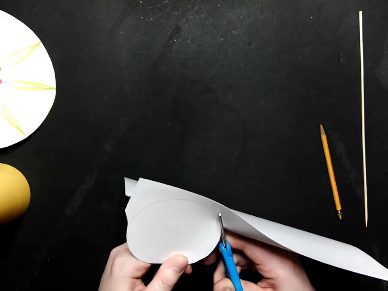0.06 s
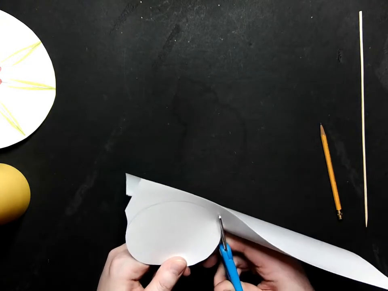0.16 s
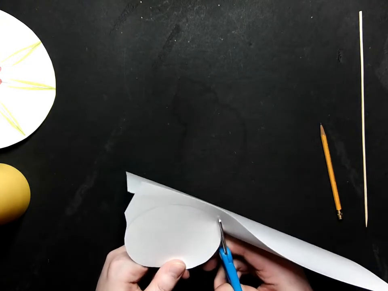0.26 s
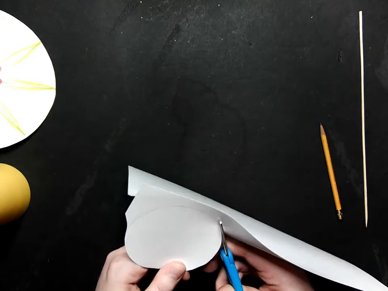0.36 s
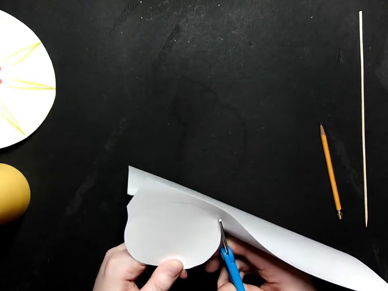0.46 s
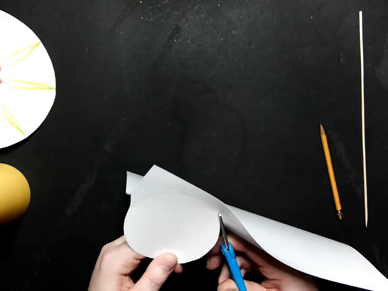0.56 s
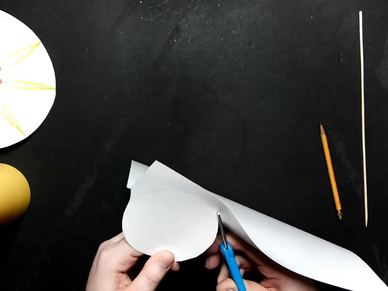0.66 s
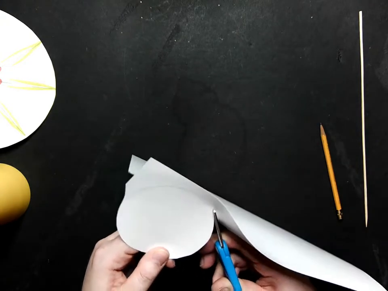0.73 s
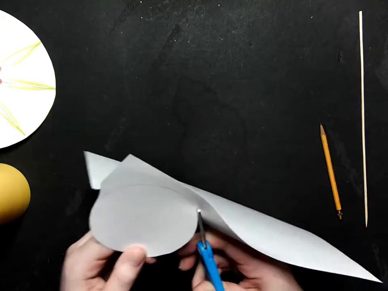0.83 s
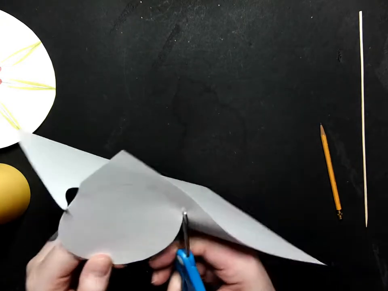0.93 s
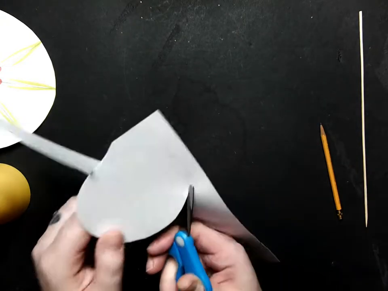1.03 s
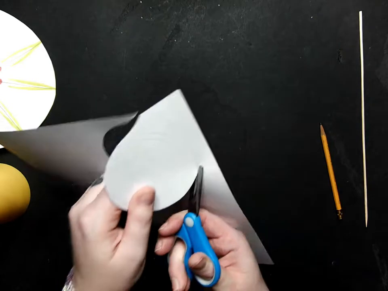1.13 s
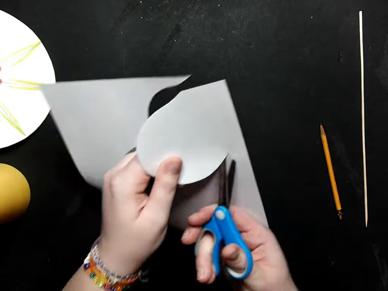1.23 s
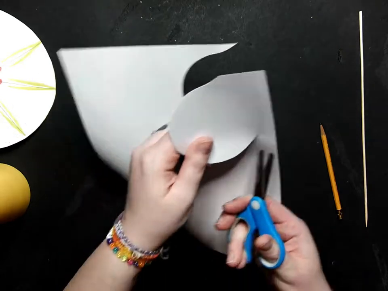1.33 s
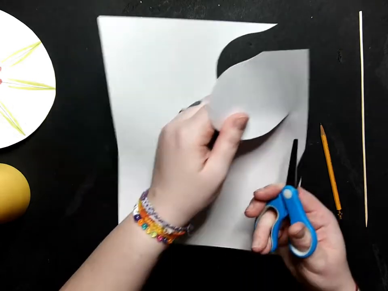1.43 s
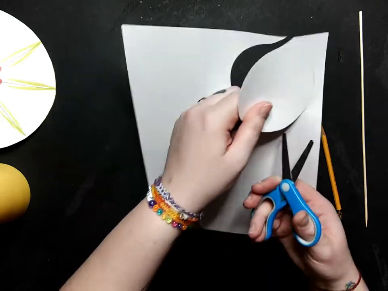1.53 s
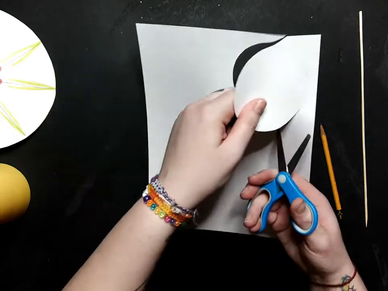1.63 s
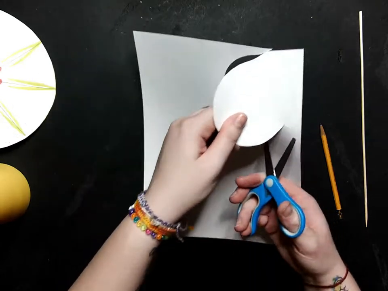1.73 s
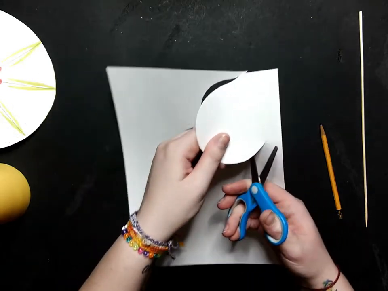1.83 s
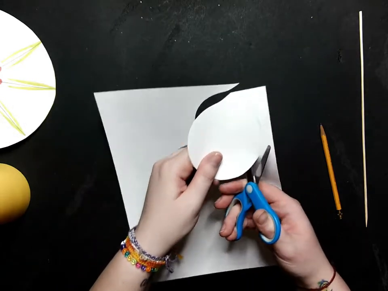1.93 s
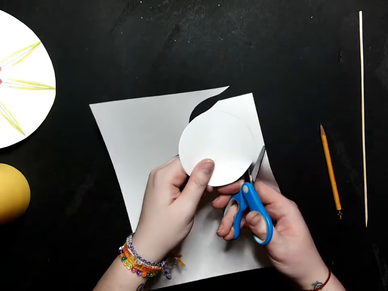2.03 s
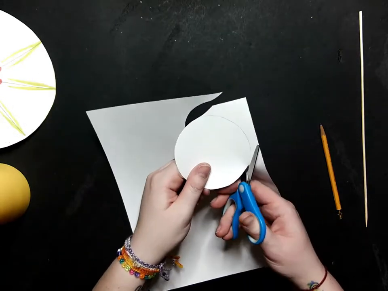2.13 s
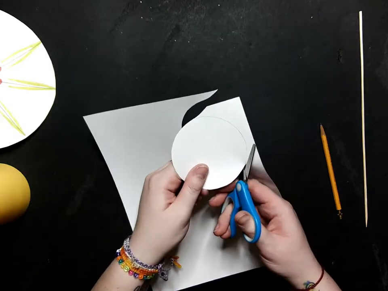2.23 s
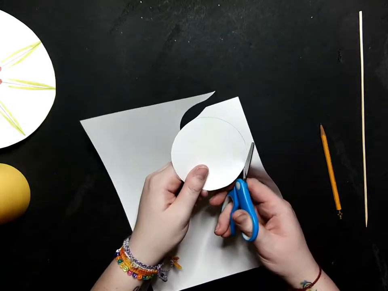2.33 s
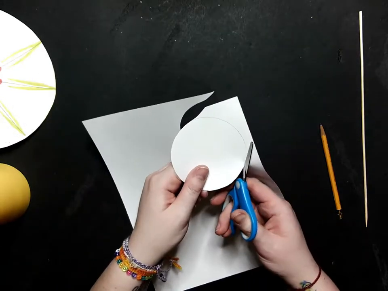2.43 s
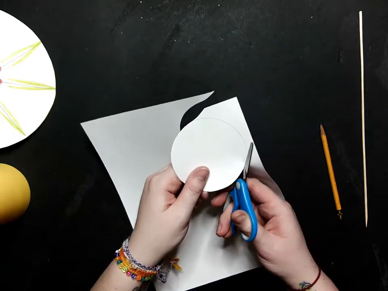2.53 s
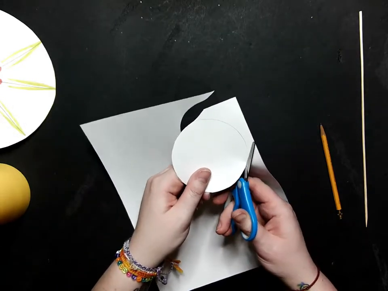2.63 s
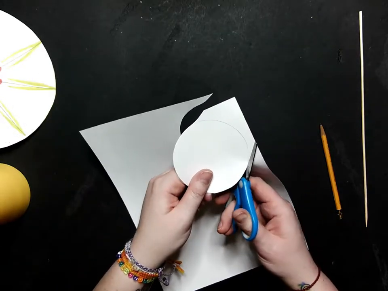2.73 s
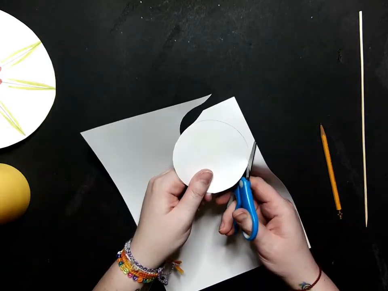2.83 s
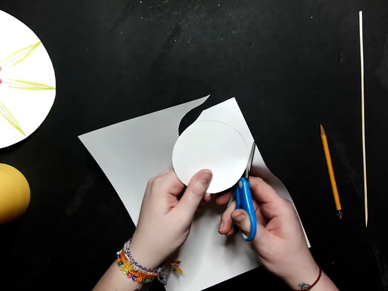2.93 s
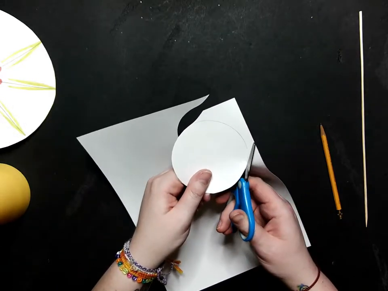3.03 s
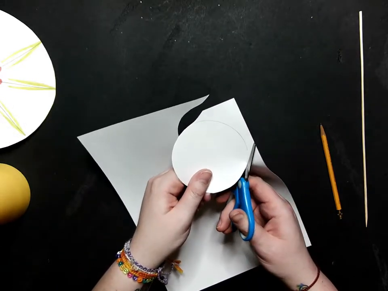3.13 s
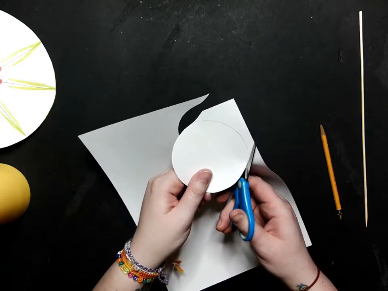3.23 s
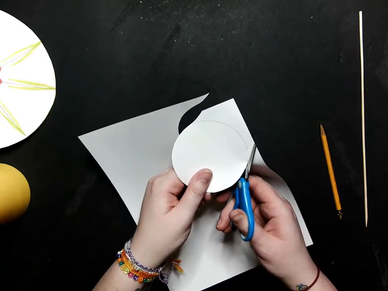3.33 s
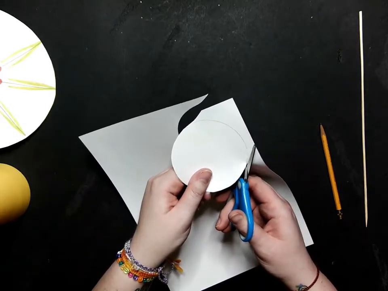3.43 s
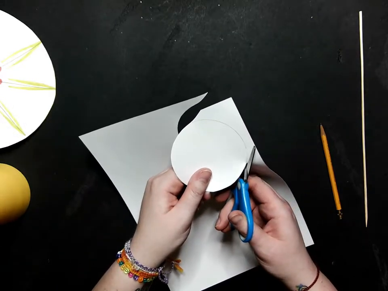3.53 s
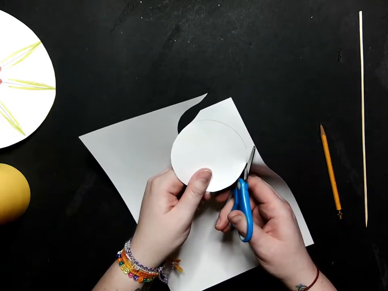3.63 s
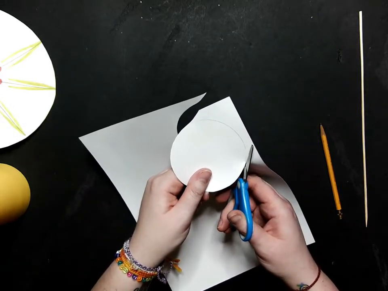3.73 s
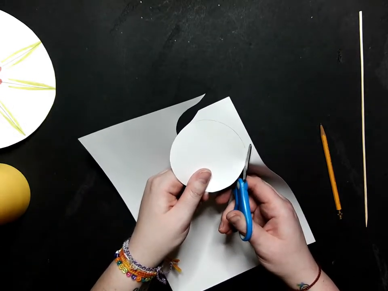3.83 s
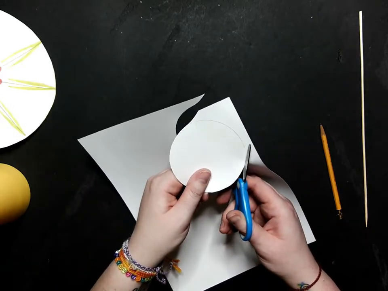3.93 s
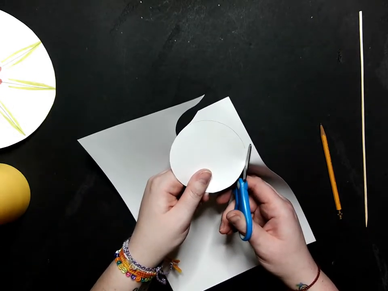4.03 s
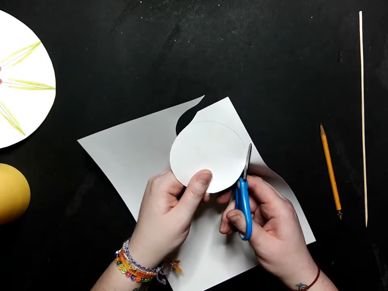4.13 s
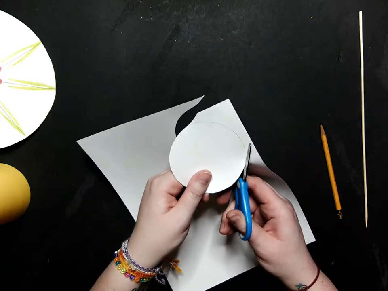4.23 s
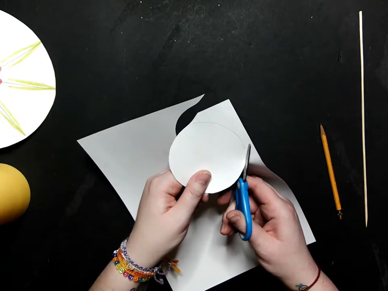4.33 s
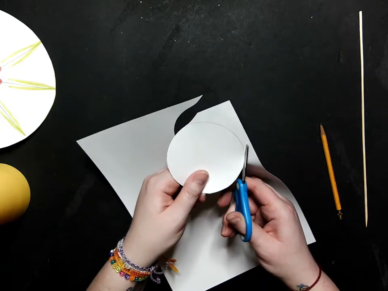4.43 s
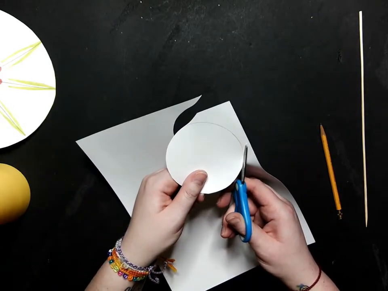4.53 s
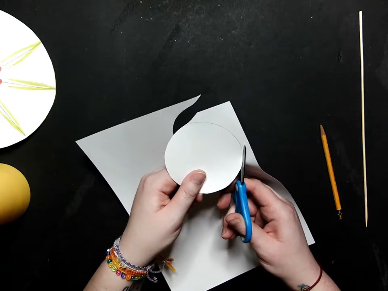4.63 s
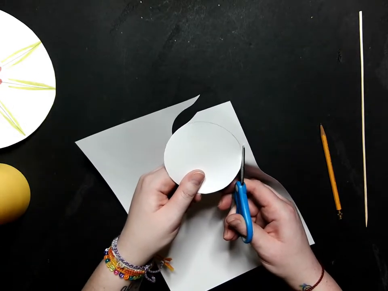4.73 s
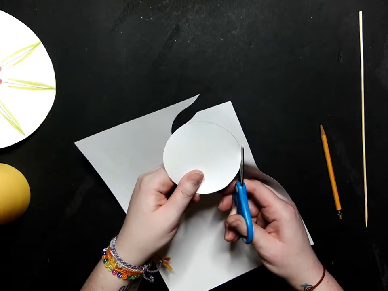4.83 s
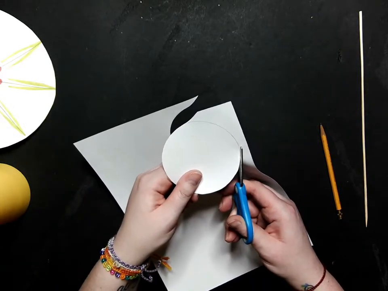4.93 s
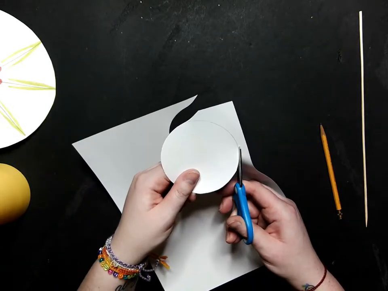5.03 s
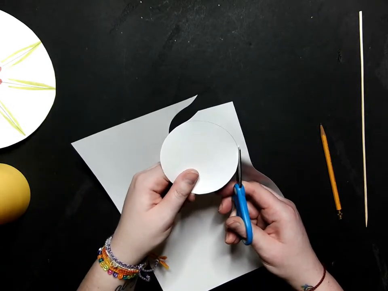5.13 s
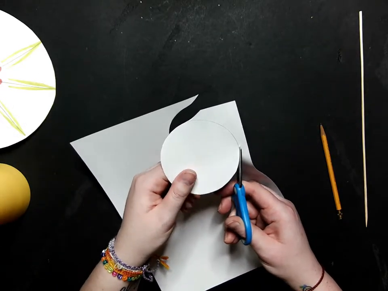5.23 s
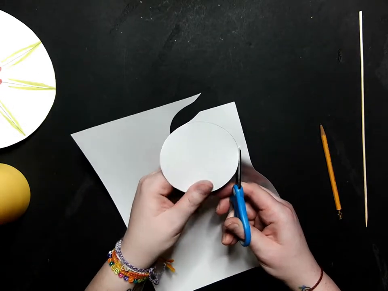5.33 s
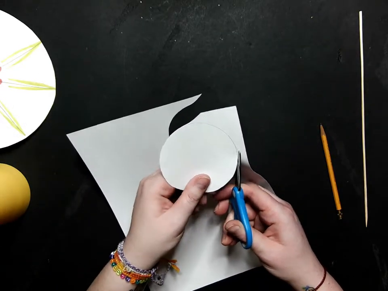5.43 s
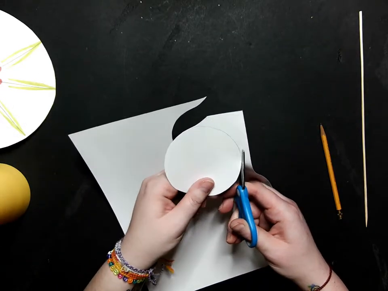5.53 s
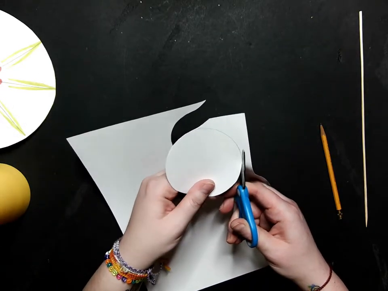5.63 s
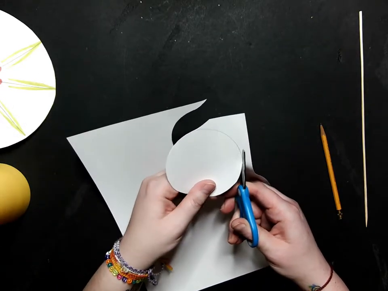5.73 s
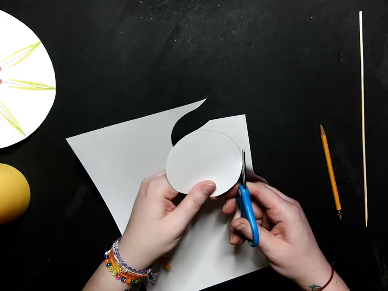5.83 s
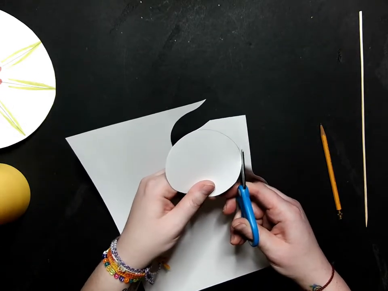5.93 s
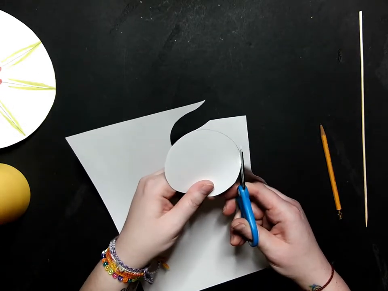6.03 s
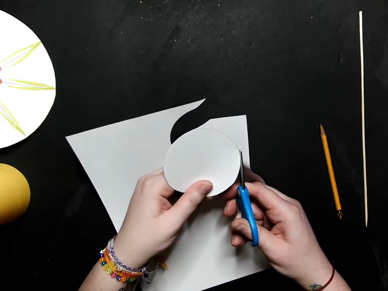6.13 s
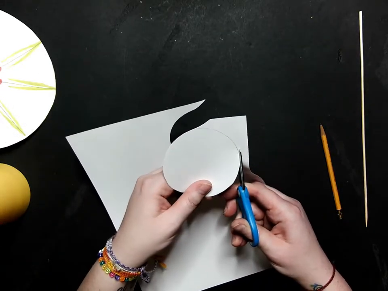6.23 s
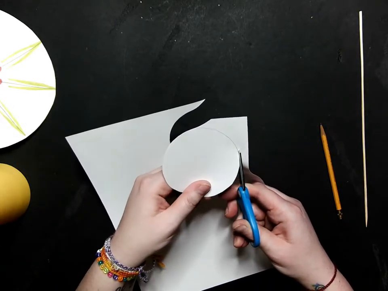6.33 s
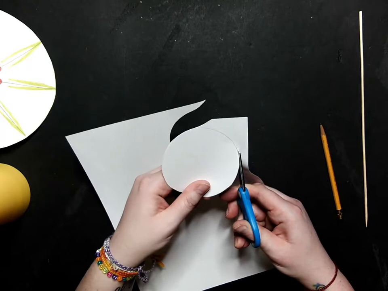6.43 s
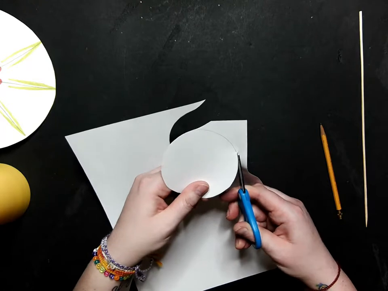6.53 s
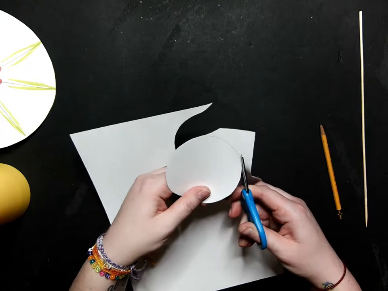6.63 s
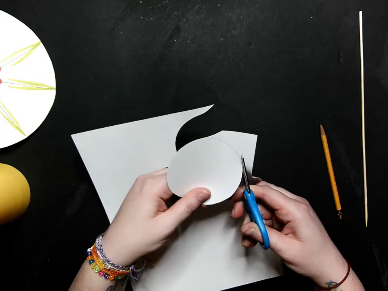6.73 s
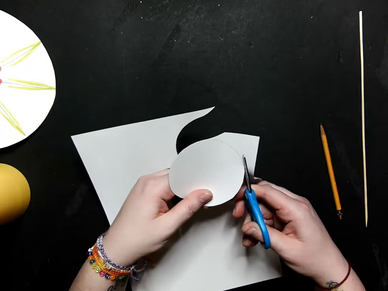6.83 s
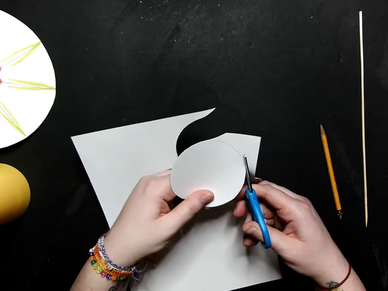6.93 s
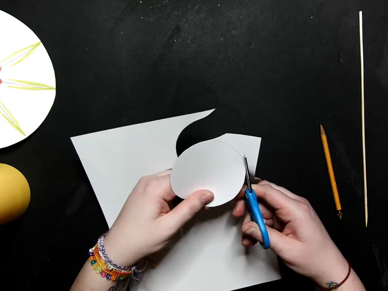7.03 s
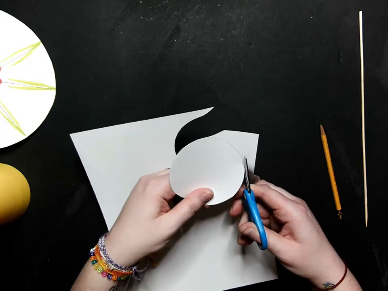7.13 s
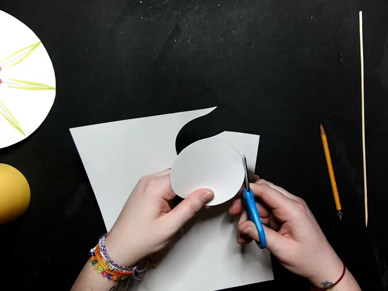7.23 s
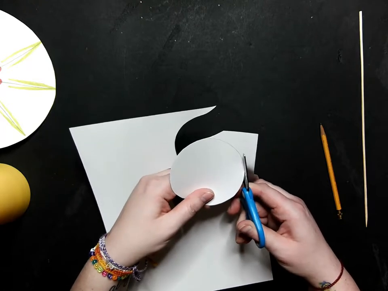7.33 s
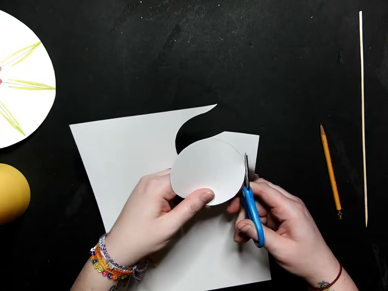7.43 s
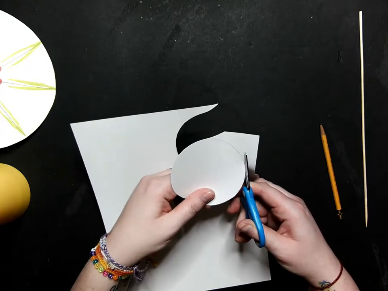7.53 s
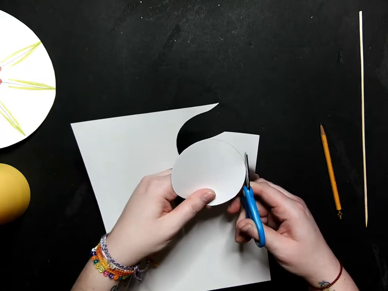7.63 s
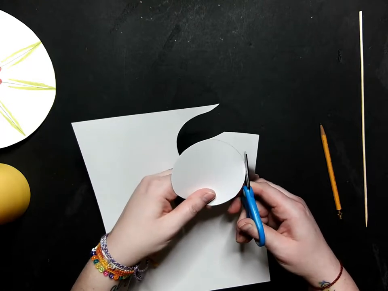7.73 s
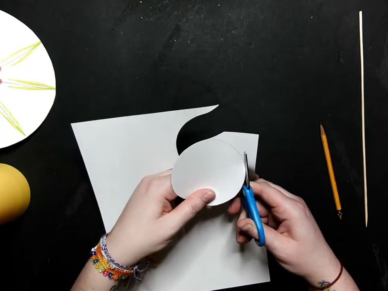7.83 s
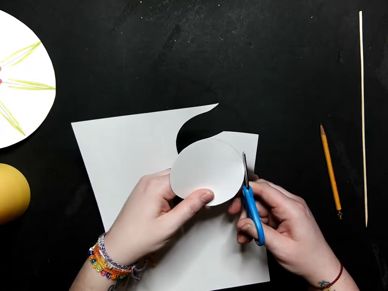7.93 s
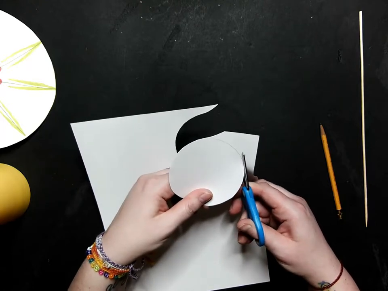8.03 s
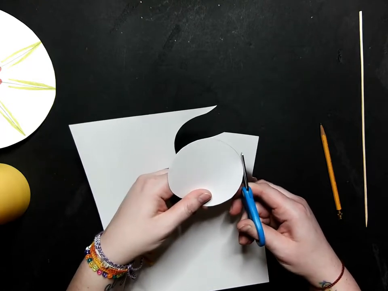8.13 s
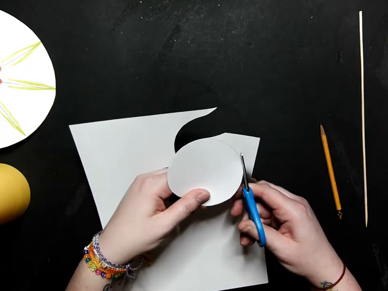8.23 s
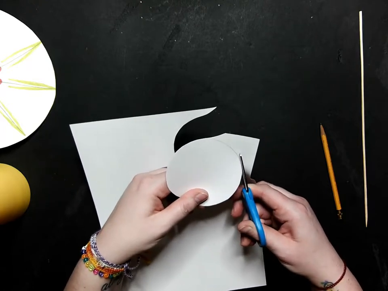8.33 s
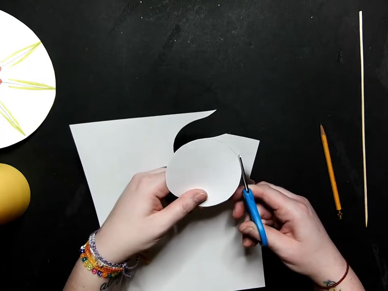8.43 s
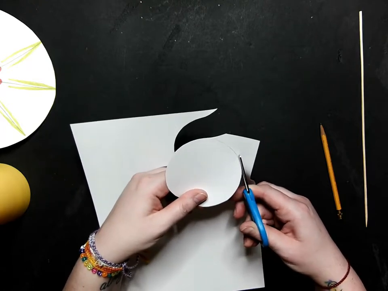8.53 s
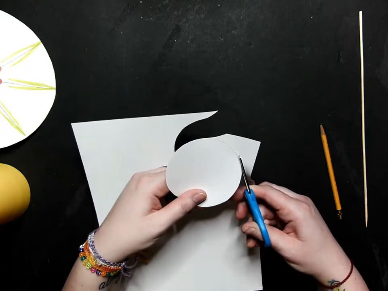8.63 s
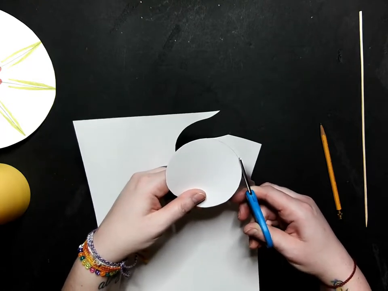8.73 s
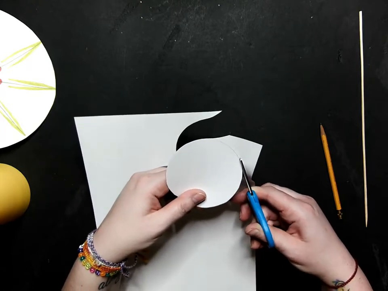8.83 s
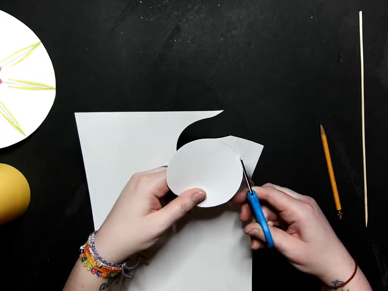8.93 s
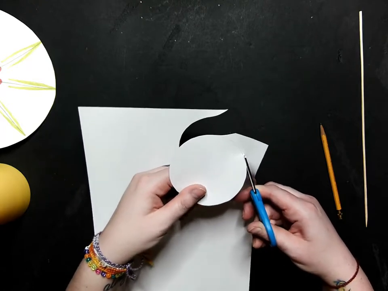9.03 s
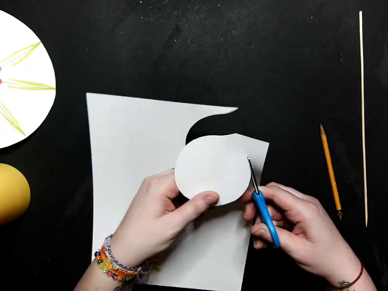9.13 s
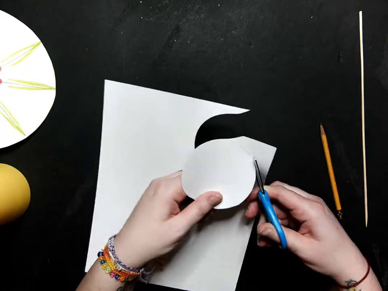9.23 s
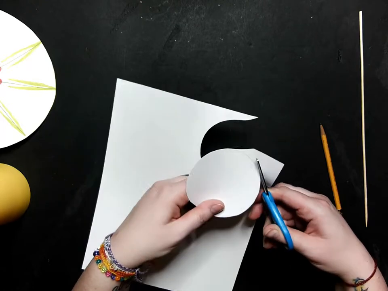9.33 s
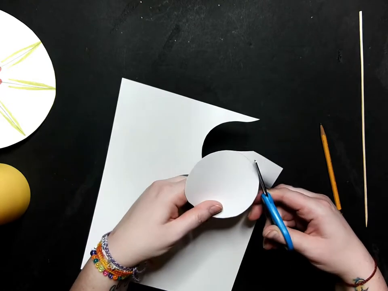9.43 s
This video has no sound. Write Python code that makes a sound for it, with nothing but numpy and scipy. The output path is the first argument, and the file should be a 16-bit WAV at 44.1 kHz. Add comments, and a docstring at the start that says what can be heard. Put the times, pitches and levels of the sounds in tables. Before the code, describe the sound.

A close, dry perspective on small scissors cutting stiff paper in a quiet indoor room. From 0 to 0.5 s a rasp and rapid, uneven crisp cracks. From 0.7 to 1.6 s the sheet is turned: airy swishes, a few cracks, and hollow, wobbling flaps, strongest near 1.25 and 1.4 s. Brief squeaky blade creaks come at 1.8-1.95 s with soft sliding, then sparse light scrapes and faint ticks from 2.3 to 3.9 s. A dense burst of crunching snips runs 4.1-5.1 s, followed by rustles to 5.6 s. Another sharp cluster falls at 5.85-6.4 s, then lighter scrapes and a swish near 7.1 s. Quiet cuts lead to firmer snips around 8.2 s, a fine metallic ticking at 8.35-8.7 s, two loud snaps at 8.8-8.9 s, and papery sliding with small snips until about 9.5 s. Faint hiss underneath.

```python
"""A rasp and a quick run of sharp cracks are heard first: small scissors cut a circle out of stiff card, close by.
Card fractures in short bursts of breaking fibres, filtered by the held sheet; the blades scrape as jerky noise
and now and then stick and slip, each slip striking a bank of damped steel modes. Between cuts the sheet is turned
and slides over hands and table as flickering noise, and it flaps as it buckles, with a hollow low wobble.
The quiet, dry room adds a short diffuse tail, over a faint hiss."""
import sys
import numpy as np
from scipy import signal
from scipy.fft import rfft, irfft, next_fast_len
from scipy.io import wavfile
from scipy.ndimage import uniform_filter1d

SR = 44100
rng = np.random.default_rng(int(sys.argv[2]) if len(sys.argv) > 2 else 0)


def transcribe(u):
    """Save the signal u as a 16-bit wav file named by the first command-line argument.

    u: samples, shape (n,) or (channels, n), limited to [-1, 1]; the rate is SR.
    q: integer samples, one column per channel.
    """
    v = np.clip(np.atleast_2d(u).T, -1, 1)
    q = np.round(v * 32767).astype(np.int16)
    wavfile.write(sys.argv[1], SR, q)


N = 417627

# Fractures of the card: start_s, length_s (held within 0.002 to 0.025), level_db, body_db
FRACTURES = [(0.033, 0.0094, -29.5, -0.5), (0.0526, 0.004, -31.5, 5.5), (0.123, 0.0084, -44, -6.5),
             (0.156, 0.0062, -27, -0.5), (0.1927, 0.0059, -27, 1), (.3087, 0.005, -36.5, 10),
             (0.3561, .005, -35, 5.5), (0.3656, 0.01, -31, 3.5), (0.396, .009, -40.5, -2),
             (0.4397, 0.0097, -29.5, 1.5), (0.4787, 0.0024, -32.5, 8), (.488, 0.0028, -35.5, 0),
             (0.504, 0.0015, -29.5, -8), (0.5192, 0.011, -41, 2.5), (0.848, 0.019, -35.5, 1),
             (.907, .018, -37, -1), (1.0363, 0.0097, -41, 7.5), (1.0515, 0.0076, -34.5, -3.5),
             (1.095, 0.011, -37.5, 0), (2.541, 0.0079, -50, -0.5), (3.7605, 0.0063, -47.5, 6),
             (3.929, .008, -65, -19), (3.963, 0.00658, -58.5, 8.5), (4.12, 0.0037, -53.5, 4.5),
             (4.1306, 0.0038, -44, 7.5), (4.158, 0.0046, -31, 3.5), (4.184, .011, -38.5, 1),
             (4.203, .011, -41, 5), (4.2742, 0.011, -34.5, 1), (4.313, .014, -50, -3),
             (4.3618, 0.007, -33, 4), (4.4, 0.0097, -42.5, -6), (4.4643, 0.0035, -34.5, 0.5),
             (4.499, 0.0062, -33.5, -2.5), (4.511, 0.0092, -42.5, 1.5), (4.5614, 0.014, -39.5, -17),
             (4.6261, 0.0068, -28, -0.5), (4.6977, 0.0025, -30.5, 0), (4.7664, 0.016, -45.5, 0),
             (4.8126, .011, -30, -0.5), (4.8926, 0.008, -33, -1.5), (4.902, 0.0031, -25.5, -2),
             (4.936, 0.015, -38.5, -3.5), (4.967, .008, -46.5, 4), (5.054, 0.0065, -44.5, -12),
             (5.0732, 0.0047, -26, -7), (5.5144, 0.021, -44, -11), (5.646, .004, -65, -1),
             (5.704, .017, -60.5, -22), (5.773, 0.0048, -53.5, -2), (5.826, 0.0098, -59, -8.5),
             (5.8493, 0.0074, -33, -0.5), (5.9112, 0.008, -34.5, -8.5), (5.9426, 0.00131, -30, 2),
             (5.951, .003, -32.5, -3), (5.9866, 0.0093, -25.5, -7), (6.006, .0064, -33, 1),
             (6.026, .0077, -35.5, 0.5), (6.225, 0.0073, -38.5, -27), (6.276, 0.0036, -30.5, 0.5),
             (6.345, 0.0043, -47.5, 3.5), (6.3575, 0.0062, -22.5, -11), (6.4075, .003, -26, -7.5),
             (6.6879, 0.01, -42, -8.5), (6.806, 0.011, -55.5, 17.5), (6.868, 0.012, -50.5, -1),
             (6.9936, 0.012, -48.5, 2.5), (7.241, 0.0125, -52, -0.5), (7.304, 0.011, -48, -17),
             (7.353, 0.0179, -41, -1), (7.595, 0.019, -65, -13), (7.813, .008, -56, -22),
             (7.831, .006, -54, -19), (7.8512, 0.008, -44.5, -2), (7.8929, 0.00616, -42, -1),
             (8.041, 0.0058, -40, -2), (8.078, 0.0052, -45.5, -10.5), (8.1012, 0.0044, -42, -10.5),
             (8.166, .0083, -31, 1), (8.2005, 0.0059, -23, -5), (8.227, .009, -34, -2),
             (8.817, 0.0098, -21.5, -1.5), (8.8767, 0.0047, -20, -8.5), (9.1133, 0.01, -33, 8),
             (9.3007, 0.0054, -44, -5), (9.322, 0.0087, -44, -13)]
# Single slips of blade on blade: start_s, level_db, body_db, air_db
SINGLE_SLIPS = [(2.7031, -69, -13, 14), (2.7477, -51, 12, 4), (3.1622, -69, 7, 5),
                (3.3962, -64.5, -18, 8.5), (3.839, -74.5, 2, 10.5), (3.8709, -85, 3, 6),
                (7.7325, -79, 0, -9), (8.4086, -54.5, -30, -7), (8.4904, -52, -20, -13),
                (8.6022, -55, 9.5, 0), (8.7437, -51.5, 21, 2)]
# Blades dragging along the card: start_s, length_s (at least 0.01), first_level_db, body_db, swell_db (start to end)
STROKES = [(0, 0.018, -34, 16, -22.5), (0.098, .15, -49.5, 6, -12), (0.309, 0.023, -39.5, -11, -16),
           (.362, .175, -57.5, 7, 5), (2.279, 0.014, -48.5, -10, 2), (2.31, .047, -43.5, 0, -3.5),
           (2.46, 0.023, -47, 1, -1), (2.557, 0.084, -41.5, 3.5, 0), (2.705, 0.16, -45, -1.5, -11),
           (2.899, 0.015, -41, -6.5, -8.5), (2.976, 0.047, -42.5, -3.5, -11.5),
           (3.094, 0.014, -55.5, -11, -10), (3.199, 0.022, -47, -2.5, -2.5), (3.275, 0.036, -43.5, -3, -13),
           (3.419, 0.028, -59, -1, -9), (3.598, .069, -55.5, -8, -5.5), (3.764, 0.042, -61, -13, -6.5),
           (4.162, .17, -57, 2, -1.5), (4.348, 0.11, -48, -5, -16), (4.455, 0.079, -55, -4.5, -1),
           (4.564, 0.0267, -53, -1, 3), (4.635, 0.16, -50.5, 0, -8), (4.831, 0.19, -48.5, 0, -1.5),
           (5.073, 0.059, -42, 3.5, -18), (5.78, 0.066, -69, -1, -3), (5.854, 0.041, -48, 1.5, -14),
           (5.913, 0.091, -54.5, 7.5, -11), (5.992, 0.0728, -36.5, 1.5, -17.5),
           (6.228, 0.089, -42.5, -2.5, -22.5), (6.344, 0.14, -49.5, 2, -12.5), (6.69, 0.052, -49, 5, -4.5),
           (6.799, 0.072, -52, 2, -3.5), (7.284, 0.11, -55, -3, 8.5), (7.83, .12, -64, -12, 0),
           (7.994, .14, -71, -12, 12.5), (8.177, 0.085, -57, 1.5, 5.5), (8.539, 0.071, -44, -9, -13),
           (8.619, .12, -48, -3, -5), (8.744, 0.15, -49.5, 3.5, 3), (9.284, 0.085, -59, 8.5, -10)]
# Buckling of the sheet: peak_s, rise_s, t60_s, level_db, thump_db
BUCKLINGS = [(.92, 0.026, 0.18, -43.5, 17), (1.068, 0.019, 0.081, -42.5, 19),
             (1.258, 0.0056, 0.145, -26.5, 1.5), (1.402, 0.013, 0.11, -18, -4.5),
             (1.47, 0.018, 0.28, -32, 4.5)]
# Modes of the blades: frequency_hz, relative_level_db, free_t60_s
BLADE_MODES = [(2017.8, -19, .016), (2730, -6.5, 0.06), (2360, 14.5, 0.048), (3430, 14, 0.042),
               (3870, -19, 0.0093), (4770, 15.5, 0.041), (5560, 12, 0.021), (6130, 21.5, 0.01),
               (7970, -16, .011), (8570, -26, .014), (9900, -24, .012), (11200, -2, .01),
               (13000, -11, 0.0052), (14700, -15, 0.0064)]
# Spectral envelopes, relative within each: frequency_hz, density_db
SNAP_COLOUR = [(40, -27), (100, -27.5), (200, -14), (380, 0), (600, -1), (1400, -0.5), (1700, -3.5),
               (2400, 1.5), (4300, 1), (6200, -2.5), (9000, -7), (12000, -7.5), (16000, -19.5)]
STROKE_COLOUR = [(70, -39.5), (200, -25.5), (500, -1), (750, -0.5), (1700, -1.5), (2400, 2), (3000, -1.5),
                 (4600, 4), (5400, -4.5), (7000, 1.5), (9000, -4.5), (12000, -2.5), (16000, -15)]
SLIDE_COLOUR = [(70, -39), (140, -18), (280, -4), (480, 8), (1300, 2.5), (1650, -4), (2300, -3),
                (3000, -4.5), (4400, -2.5), (5400, -7), (7000, -6), (10000, -11.5), (16000, -21)]
FLAP_COLOUR = [(70, -42.5), (140, -14.5), (300, -4), (580, 3), (1250, 1), (1600, -6.5), (2500, -10.5),
               (3600, -33.5), (8000, -45.5), (16000, -62)]
CONTACT_COLOUR = [(100, -61), (450, -14.5), (1000, -27), (1700, -3), (2400, 5), (6000, 2.5), (11000, 4.5),
                  (16000, -5.5)]
HISS_COLOUR = [(30, -25), (80, -15), (130, -2), (500, -6), (900, -6), (1800, -6.5), (2400, -5),
               (3500, -10.5), (4500, -9.5), (8000, -14), (16000, -19)]
# Ring of the sheet and the room: centre_hz, t60_s, level_db
ROOM_BANDS = [(199.07, 0.23, -8), (497, 0.13, -7), (1410, 0.058, -10.5), (3700, 0.089, -16.5),
              (9990, 0.051, -14)]
# How the sheet is held until the hand shifts again: start_s, ring_hz, note_hz, air_db
GRIPS = [(0, 4300, 1190, -1), (.045, 3370, 1180, 1.5), (.175, 4250, 670, -1), (.33, 4160, 354, 0.5),
         (.42, 3390, 345, -1), (.46, 3380, 1200, -0.5), (.7, 4070, 575, -1.5), (2.24, 4630, 600, 4),
         (2.51, 2650, 700, 3), (3.72, 5920, 600, -1), (4.34, 5750, 1380, -1.5), (4.79, 3760, 330, 0),
         (4.897, 6060, 560, -2.5), (5.65, 5270, 448.8, -0.5), (5.97, 2240, 459, -1.5),
         (6.0, 5200, 450, 1.5), (6.25, 3840, 984, 1.5), (6.6, 2027, 520, -0.5), (7.21, 4830, 523, 0.5),
         (7.33, 2250, 520, -1.5), (7.6, 3480, 903.2, 0.5), (8.185, 2350, 864, -1), (8.45, 4100, 1044, 3),
         (8.85, 2270, 1003, 0)]
# Even runs of stick-slip: start_s, length_s, gap_s, first_level_db, body_db, air_db
SLIP_RUNS = [(2.808, .06, 0.017, -65.5, 1, 15), (3.606, .09, 0.02674, -60.5, 5, 1),
             (8.3482, .04, 0.015, -53.5, -26, -2.5), (8.427, .01, 0.0076, -61, -11.5, -9.5),
             (8.502, .068, .0079, -46.5, 8, -3.5), (8.536, .02, .0088, -53.5, 20, -1),
             (8.623, .085, 0.01, -51, 13, 0.5)]
# Creaks on one note, as of closing blades: start_s, length_s, first_level_db, note_hz
CREAKS = [(1.817, 0.068, -32, 2200), (1.905, 0.047, -34.5, 2290), (6.804, 0.04, -46.5, 1481)]
# Swishes of the turning sheet: peak_s, rise_s, fall_s, level_db, body_db, air_db
SWISHES = [(.75, 0.078, 0.13, -42.5, -9, 0), (.91, 0.0709, 0.036, -35.5, -8.5, -6.5),
           (1.02, 0.089, 0.1282, -47, -5.5, -8.5), (1.171, 0.026, 0.0243, -50, -5.5, -6.5),
           (1.262, 0.04, 0.041, -42, -1, -6), (1.36, 0.034, 0.033, -38, -8.5, -1),
           (1.48, 0.038, .12, -46.5, 11, -8), (1.649, 0.035, 0.058, -42.5, -5, -11),
           (1.76, .1, 0.0857, -37, -16.5, -3.5), (1.93, 0.087, .2, -42.5, -9, -3.5),
           (2.19, 0.14, 0.039, -46, -10, -3), (5.169, 0.018, 0.0257, -45, -33, -4.5),
           (5.281, .085, 0.086, -38.5, -3.5, -3.5), (5.42, 0.065, .055, -41.5, -11, -8.5),
           (5.55, .05, 0.048, -49, -17, -4.5), (6.52, 0.032, 0.0875, -39.5, -17, -8),
           (7.018, .08, 0.058, -59, -1.5, -12), (7.13, 0.068, 0.058, -42, -9, -6),
           (8.9, 0.033, .1, -48, -10.5, -4), (9.08, 0.084, .06, -37.5, -8.5, -4),
           (9.199, 0.074, 0.067, -41, -12.5, -4), (9.46, 0.0642, 0.053, -42.5, -13, -4)]

BODY_HZ, MID_HZ = (150, 1500), (1500, 7000)  # bands in which levels are set
TOP_HZ = 15900
HIT_SIZE = 4096  # samples; a struck sound lasts half of this
HISS_DB = -79  # before the suppressor
# small random cracks: densest rate in strokes, length, level over the scrape and its scatter
CRACKLE_PER_S, CRACKLE_S, CRACKLE_DB, CRACKLE_SPREAD_DB = 18, .004, 3, 2
CRINKLE_PER_S, CRINKLE_DB = 16, -4  # the same in the bending sheet; level over the swish
# a run weakens as the pressure eases; contact crack against ring
SLIP_FADE_DB_PER_S, SLIP_JITTER_S, CONTACT_DB = 81, .0003, -2.5
STROKE_AIR_DB, STROKE_RING_DB = -2.5, 4  # against the air of the grip; height of its ring
CREAK_RING_DB, CREAK_SWELL_DB, CREAK_BODY_DB, CREAK_AIR_DB = 15, -6.5, 3.5, -7.5
SWISH_EDGE_DB, SWISH_SHAPE = -10.5, 2.33  # level one rise before or one fall after the peak; flatness of top
BREAK_LOOSE_S = .014  # the sheet lets go this quickly at the start of a swish


def undb(db):
    """Logarithmic level: decibels become an amplitude gain."""
    return 10 ** (np.asarray(db) / 20)


def unit(x):
    """Normalisation: scale to rms 1."""
    return x / np.sqrt(np.mean(x ** 2) + 1e-20)


def add(out, s, x):
    """Superposition: mix x into out from time s on."""
    i = int(min(s * SR, N - 1))
    x, i = x[max(-i, 0):], max(i, 0)
    out[i:i + len(x)] += x[:N - i]


def slope(points, hz):
    """Spectral envelope: join (Hz, dB) points on a log-frequency axis."""
    f, db = np.transpose(points)
    return np.interp(np.log(hz + 1), np.log(f), db)


def paint(x, colour, band=MID_HZ, body_db=0, air_db=0,
          ring_hz=3000, ring_db=0, ring_octaves=.2, ripple_db=0):
    """Minimum-phase filtering: envelope, two shelves and a resonance; white input keeps its rms in the band."""
    n = 2 * next_fast_len(len(x) // 2 + HIT_SIZE // 2)
    hz = np.arange(n // 2 + 1) * SR / n
    shelves = slope([(1200, body_db), (2000, 0.0045), (5500, 0.0024), (9000, air_db)], hz)
    ring = ring_db / (1 + (np.log2((hz + 1) / ring_hz) / ring_octaves) ** 2)
    # waves bouncing between the sheet's edges ripple the spectrum, drawn anew for each sound
    knots = np.linspace(0, np.sqrt(SR / 2), 80)
    ripple = ripple_db * np.interp(np.sqrt(hz), knots, rng.standard_normal(80))
    db = slope(colour, hz) + shelves + ring + ripple
    in_band = (hz > band[0]) * (hz < band[1])
    db = db - 10 * np.log10(np.mean(undb(db) ** 2 * in_band))
    # folding the cepstrum onto positive time makes the filter causal
    cepstrum = irfft(np.log(undb(db)))
    cepstrum[1:n // 2] *= 2
    cepstrum[n // 2 + 1:] = 0
    return irfft(rfft(x, n) * np.exp(rfft(cepstrum)), n)


def split(x, edges_hz):
    """Complementary filtering: cut a sound into neighbouring bands that sum to it again."""
    lows = [signal.sosfiltfilt(signal.butter(4, hz, fs=SR, output="sos"), x) for hz in edges_hz]
    return np.diff([0 * x, *lows, x], axis=0)


def walk(n, rate):
    """Slow random modulation: chance values joined by lines, with a spread near 1."""
    at = np.arange(n) * rate / SR
    count = int(at[-1]) + 2
    return 1.1 * np.interp(at, np.arange(count), rng.standard_normal(count))


def fibres(n, rate, spread_db, rub):
    """Impulsive fracture noise: fibres break at random, a few of them big, over smooth rubbing."""
    hit = rng.random(n) < rate / SR
    size = undb(spread_db * np.minimum(rng.exponential(size=n), 4))
    breaks = unit(hit * size * rng.choice([-1, 1], n))
    return unit(breaks + rub * rng.standard_normal(n))


def judder(n, rate, depth_db):
    """Stick-slip friction: uneven jerks, each sinking by depth_db before the next."""
    phase = np.cumsum(rate * np.exp(0.71 * walk(n, rate)) / SR) + rng.random()
    return unit(undb(-depth_db * (phase % 1)))


def resonate(x, hz, width_hz):
    """Resonance: one damped mode, gain 1 at its centre."""
    return signal.lfilter(*signal.iirpeak(hz, hz / width_hz, fs=SR), x)


def flex(x, depth_db, size=5):
    """Shifting resonances of a bending sheet: neighbouring frequencies swell and sink together."""
    _, _, frames = signal.stft(x, nperseg=512)
    field = rng.standard_normal(frames.shape)
    field = uniform_filter1d(field, size, axis=0)
    field = uniform_filter1d(field, 2 * size, axis=1)
    return signal.istft(frames * undb(depth_db * unit(field)))[1][:len(x)]


def grip(s):
    """Boundary conditions: ring_hz, note_hz and air_db of the sheet as it is held at time s."""
    return [GRIPS[0], *(row for row in GRIPS if row[0] <= s)][-1][1:]


def scatter(length, rate):
    """Stratified chance: one moment in each equal share of the length, as (after_s, luck_db)."""
    count = int(length * rate)
    return [((k + rng.random()) / count * length, CRACKLE_SPREAD_DB * rng.standard_normal())
            for k in range(count)]


def hiss():
    """Stationary noise: a faint steady hiss of filtered white noise."""
    return undb(HISS_DB) * unit(paint(rng.standard_normal(N), HISS_COLOUR)[:N])


def room(x):
    """Reverberation: a short diffuse tail of decaying noise bands, the lowest lasting longest."""
    t, centres = np.arange(SR // 4) / SR, np.transpose(ROOM_BANDS)[0]
    bands = split(rng.standard_normal(len(t)), np.sqrt(centres[1:] * centres[:-1]))
    tail = 0
    for band, (_, t60, db) in zip(bands, ROOM_BANDS):
        decay = undb(-60 * t / t60) * np.minimum(t / 0.0083, 1)
        tail = tail + undb(db) * band * decay / np.linalg.norm(decay)
    return x + signal.fftconvolve(x, tail)[:N]


def swish_db(t, rise, fall):
    """Loudness of friction over a gesture: level t seconds from the peak of a swish."""
    return SWISH_EDGE_DB * np.abs(t / np.where(t < 0, rise, fall)) ** SWISH_SHAPE


def slides():
    """Sliding friction: card breaks loose, rubs over skin, steel and table, then slows again."""
    out = np.zeros(N)
    for s, rise, fall, db, body, air in SWISHES:
        t = np.arange(-rise - BREAK_LOOSE_S, 2 * fall, 1 / SR)
        speed = undb(swish_db(t, rise, fall)) * np.minimum((t - t[0]) / BREAK_LOOSE_S, 1)
        grain = fibres(len(t), rate=1500, spread_db=4.5, rub=.6)
        rub = grain * undb(1.6 * walk(len(t), 44.76))
        rub = flex(rub, depth_db=3.5)
        low, mid, high = map(unit, split(paint(rub, SLIDE_COLOUR)[:len(t)], MID_HZ))
        # a bowed sheet has more body, a leading edge more air
        mix = undb(body) * low + mid + undb(air) * high
        add(out, s + t[0], speed * undb(db) * mix)
    return out


def flaps():
    """Buckling: the whole sheet springs over and shudders with a hollow wobble."""
    out, t = np.zeros(N), np.arange(-SR // 10, SR // 3) / SR
    for s, rise, t60, db, thump_db in BUCKLINGS:
        swing = np.where(t < 0, np.exp(np.minimum(t, 0) / rise), undb(-60 * t / t60))
        shudder = rng.standard_normal(len(t)) * judder(len(t), rate=120, depth_db=8)
        flap = paint(swing * shudder, FLAP_COLOUR, band=BODY_HZ,
                     ring_hz=172, ring_db=thump_db, ring_octaves=1.0)
        add(out, s + t[0], undb(db) * flap)
    return out


def slips():
    """Stick-slip events, lone or in fading, nearly even runs: start_s, level_db, body_db, air_db."""
    events = [*SINGLE_SLIPS]
    for s, length, gap, db, body, air in SLIP_RUNS:
        for after in np.arange(0, length, gap):
            start = s + after + SLIP_JITTER_S * rng.standard_normal()
            events.append((start, db - SLIP_FADE_DB_PER_S * after, body, air))
    return events


def ticks():
    """Modal excitation: each slip strikes the same steel modes from a new spot, with a crack at the contact."""
    out, t = np.zeros(N), np.arange(HIT_SIZE // 2) / SR
    longest_t60 = .026  # s; pressed together, the blades damp each other
    modes = []
    for hz, db, t60 in BLADE_MODES:
        decay = undb(db - 60 * t / min(t60, longest_t60))
        modes.append(decay * np.cos(2 * np.pi * hz * t) * rng.choice([-1, 1]))
    modes = np.array(modes)
    for s, db, body, air in slips():
        ring = unit(undb(1.6 * rng.standard_normal(len(modes))) @ modes)
        contact = unit(rng.standard_normal(len(t)) * undb(-60 * t / .013))
        add(out, s, undb(db) * ring)
        add(out, s, undb(db + CONTACT_DB) * paint(contact, CONTACT_COLOUR, body_db=body, air_db=air))
    return out


def scrape(s, length, db, body, swell, air, ring, ring_db):
    """Jerky friction: edges ease in and scrape with the push of the hand: (start s, sound)."""
    lead = .02  # s
    length = max(length, .01)
    t = np.arange(int((length + 3 * lead) * SR)) / SR - lead
    ease = .5 + .5 * np.tanh((t - .004) / .005)
    release = np.exp(-np.maximum(t - length, 0) / 0.0065)
    push = undb(db + swell * np.clip(t / length, 0, 1)) * ease * release
    grain = fibres(len(t), rate=1800, spread_db=4.5, rub=.55)
    jerks = grain * judder(len(t), rate=130, depth_db=11)
    return s - lead, paint(push * jerks, STROKE_COLOUR, body_db=body, air_db=air,
                           ring_hz=ring, ring_db=ring_db, ring_octaves=.14, ripple_db=3.5)


def strokes():
    """Filtered friction: strokes take their colour from the grip; in a creak one resonance takes over."""
    out = np.zeros(N)
    for s, length, db, body, swell in STROKES:
        ring, _, air = grip(s)
        add(out, *scrape(s, length, db, body, swell, air + STROKE_AIR_DB, ring, STROKE_RING_DB))
    for s, length, db, note in CREAKS:
        add(out, *scrape(s, length, db, CREAK_BODY_DB, CREAK_SWELL_DB, CREAK_AIR_DB, note, CREAK_RING_DB))
    return out


def crack(s, length, db, body):
    """Brittle fracture: card strains, then a crack runs through it and rings the sheet: (start s, sound)."""
    lead = .012  # s
    ring, note, air = grip(s)
    t = np.arange(HIT_SIZE // 2) / SR - lead
    length = np.clip(length, .002, .025)
    run = np.clip(t / (0.23 * length), 0, 1) * np.exp(-np.maximum(t - 0.75 * length, 0) / 0.0024)
    strain = undb(-20.5) * np.exp(-np.abs(t) / 0.0028)
    burst = unit((run + strain) * fibres(len(t), rate=6000, spread_db=1.5, rub=0.48))
    burst = burst * np.sqrt(length * SR / len(t))  # energy grows with the length of the crack
    split_card = paint(burst, SNAP_COLOUR, body_db=body, air_db=air,
                       ring_hz=ring, ring_db=8.5, ring_octaves=0.12, ripple_db=2.5)
    # the stiff span between hand and blades answers with a hollow note
    hollow = undb(3) * resonate(split_card, note, width_hz=75)
    return s - lead, undb(db) * (split_card + hollow)


def snaps():
    """Fracture under load: big cracks of each cut, and small ones that follow the level of strokes and swishes."""
    out = np.zeros(N)
    for row in FRACTURES:
        add(out, *crack(*row))
    for s, length, db, body, swell in STROKES:
        for after, luck in scatter(length, CRACKLE_PER_S):
            level = db + swell * after / length + CRACKLE_DB + luck
            add(out, *crack(s + after, CRACKLE_S, level, body))
    for s, rise, fall, db, body, air in SWISHES:
        for after, luck in scatter(rise + fall, CRINKLE_PER_S):
            level = db + swish_db(after - rise, rise, fall) + CRINKLE_DB + luck
            add(out, *crack(s - rise + after, CRACKLE_S, level, body))
    return out


def scene():
    """Superposition of sources: scissors and card in the room, over a faint hiss."""
    faint_hiss = hiss()
    sources = snaps() + ticks() + strokes() + slides() + flaps()
    return (room(sources) + faint_hiss)[None]


def suppress(x, threshold_db, depth_db):
    """Noise suppression: each band is turned down while its own level stays under the threshold."""
    out = 0
    for band in split(x, MID_HZ):
        power = np.abs(uniform_filter1d(band ** 2, SR // 100))  # over 10 ms
        opening = power / (power + undb(threshold_db) ** 2)
        out = out + band * undb(-depth_db * (1 - opening))
    return out


def record(dry):
    """Band limiting and expansion: thin the deep bass, duck faint tails and hiss, cut the top."""
    thin = signal.sosfilt(signal.butter(1, 60, "high", fs=SR, output="sos"), dry)
    ducked = suppress(thin, threshold_db=-69.5, depth_db=6.5)
    return signal.sosfilt(signal.ellip(8, .2, 70, TOP_HZ, fs=SR, output="sos"), ducked)


dry = scene()
out = record(dry)
transcribe(out)
```